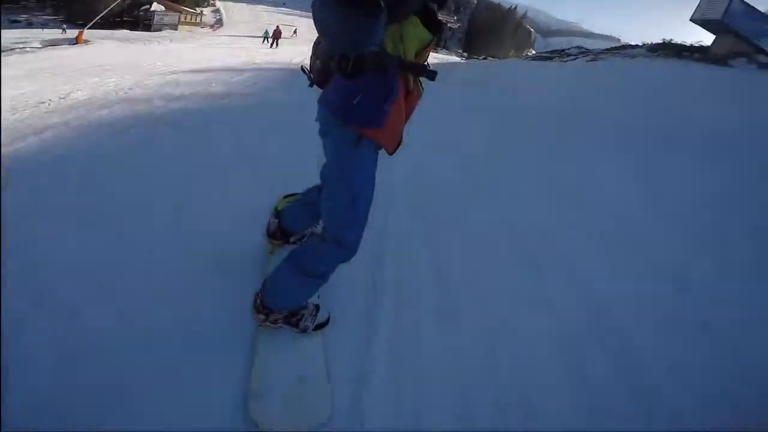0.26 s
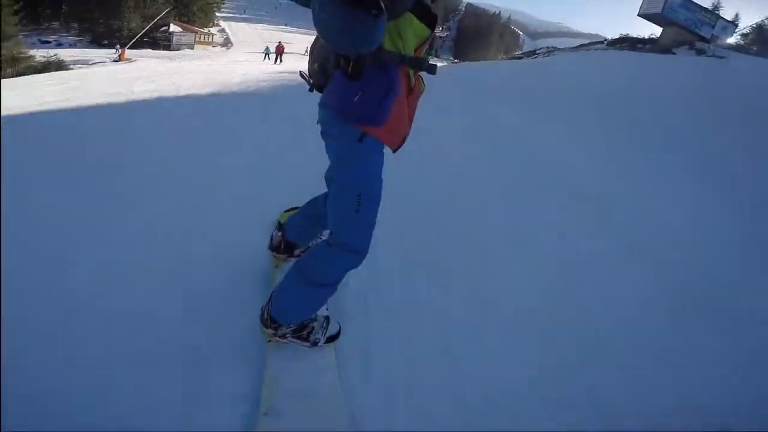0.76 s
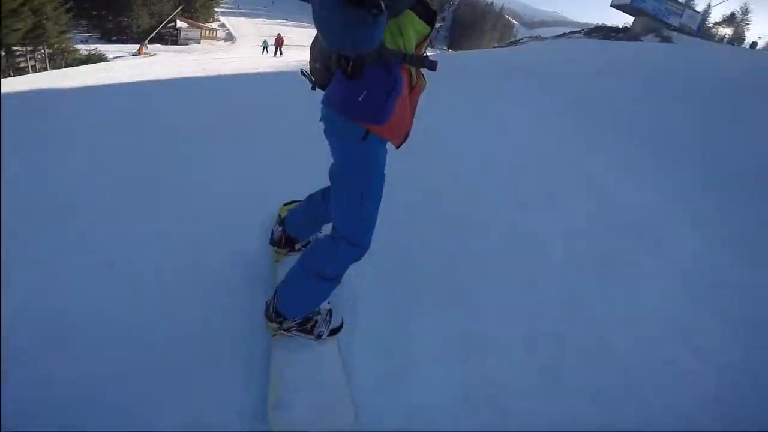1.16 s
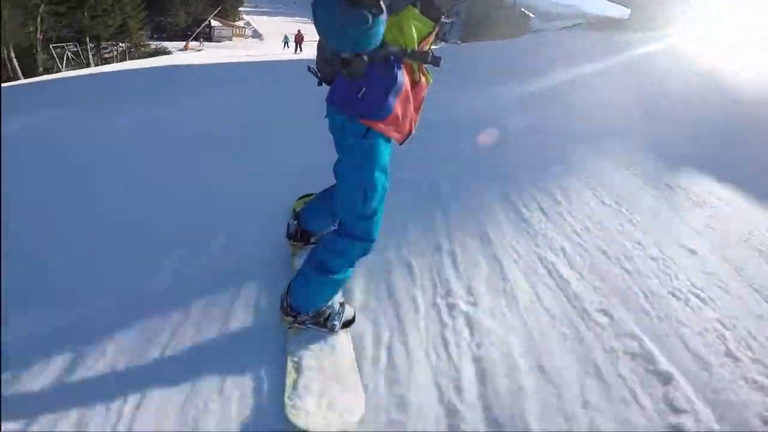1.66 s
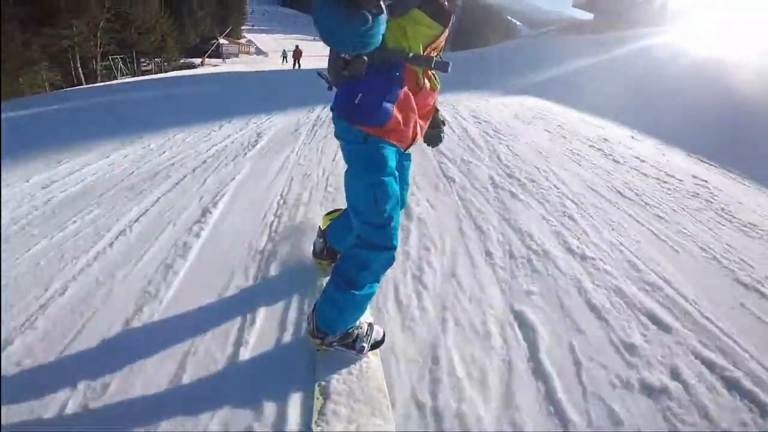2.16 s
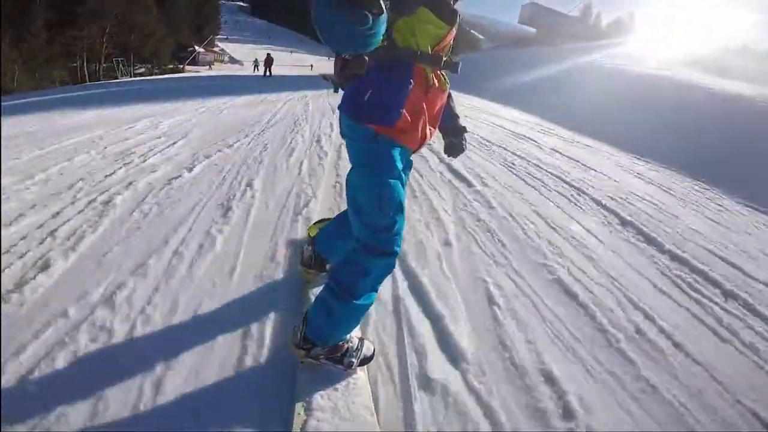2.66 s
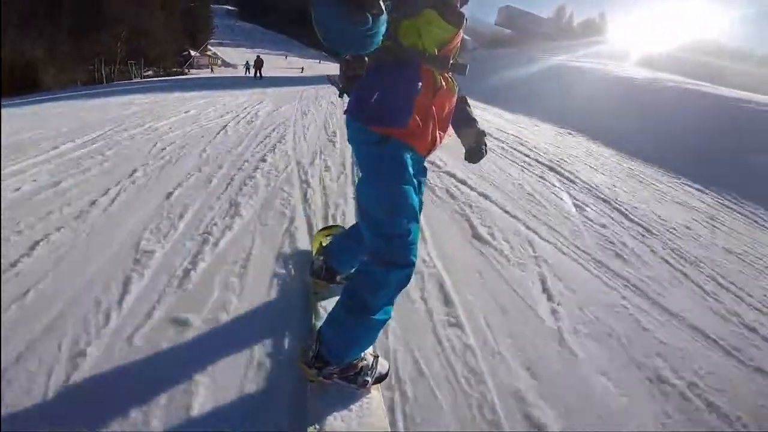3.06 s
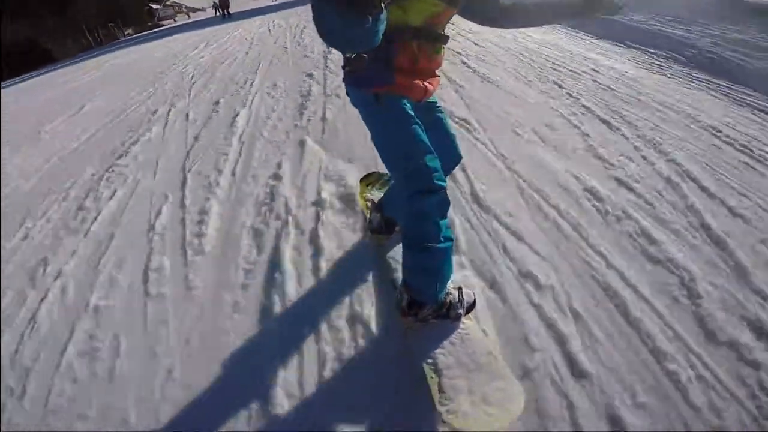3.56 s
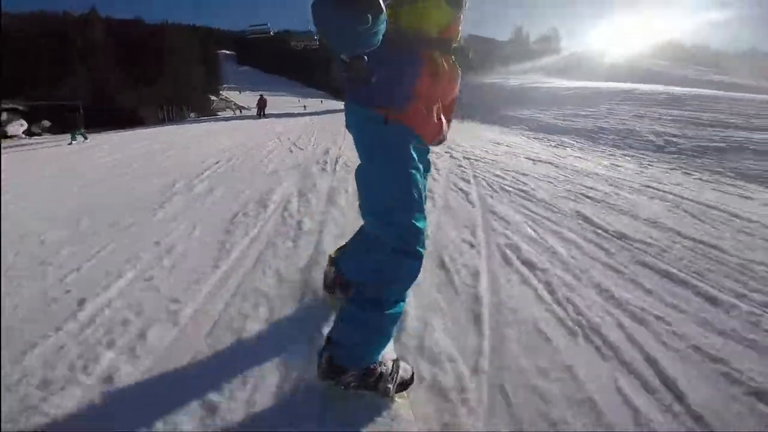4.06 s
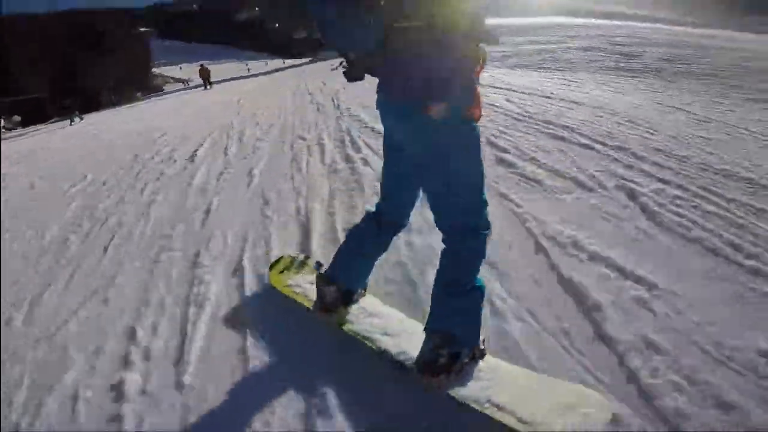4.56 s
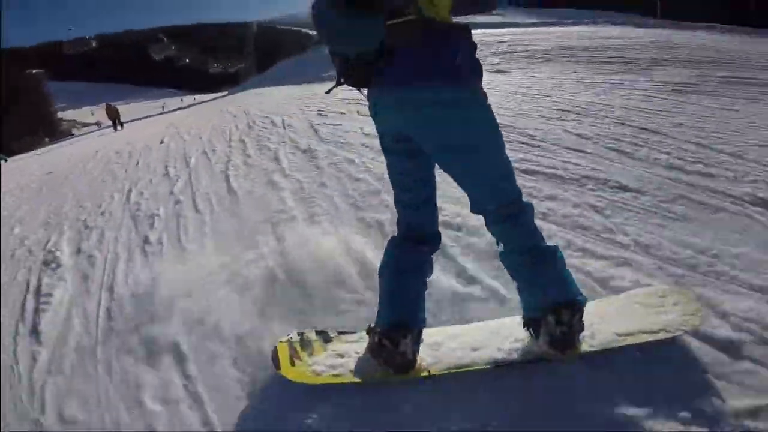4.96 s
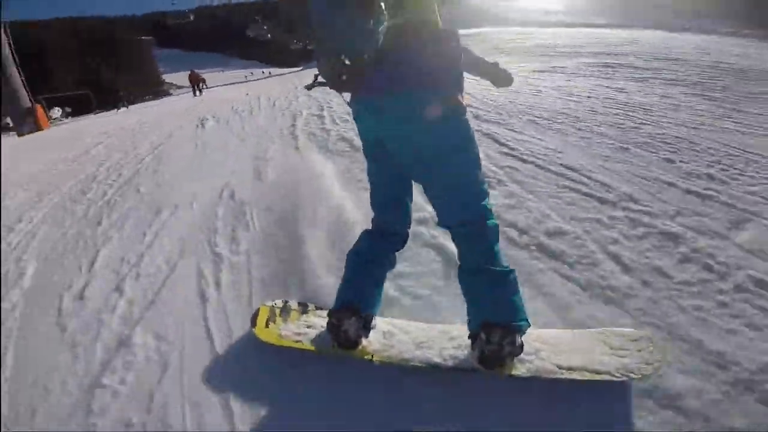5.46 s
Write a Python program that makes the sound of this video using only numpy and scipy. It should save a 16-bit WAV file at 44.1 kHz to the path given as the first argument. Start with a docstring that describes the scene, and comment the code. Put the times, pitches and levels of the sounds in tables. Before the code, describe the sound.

Wind buffets a small encased microphone carried on a pole, making a low, fluttering rumble with a very faint whistle. Close by, a snowboard grinds and hisses across packed snow, ticking against icy lumps. The grinding swells early, then thins out. After a tiny binding creak it builds again in rough bursts with spraying snow, loudest near the end.

```python
"""On a slope of firm groomed snow, a snowboard is heard from a sealed case on a hand-held pole.
Brittle fracture of crystals under the edge gives a scrape, an icy sizzle, a dull roar through the board
and fine spray, all juddering over ridges. Hard lumps crack, and a binding creaks by stick-slip friction.
Turbulent wind buffets the case, whistles faintly over it and shakes the pole at its natural frequency.
The resonances of the case colour all that reaches the small microphone inside."""
import sys
import numpy as np
from scipy import signal
from scipy.io import wavfile

SR = 44100
rng = np.random.default_rng(int(sys.argv[2]) if len(sys.argv) > 2 else 0)


def generate_wav(signal):
    """Clip the signal to [-1, 1] and save it as 16-bit WAV at the path in sys.argv[1]."""
    frames = np.transpose(np.atleast_2d(signal))
    scaled = np.clip(frames, -1, 1) * 32767
    pcm = np.round(scaled).astype(np.int16)
    wavfile.write(sys.argv[1], SR, pcm)


N = 252252

# air whistling over the openings of the case: f/Hz, width/Hz, level/dB
WHISTLE_BANDS = [(443.3, 12, -84), (486, 50, -76.5), (705.6, 66, -71.5), (989, 42, -78.5),
                 (1240, 460, -66.5)]
# swell and fade of all the whistles: t/s, gain/dB
WHISTLE_SWELL = [(0, 8.5), (1.8, -8), (2.9, 6), (3.6, 4), (5.7, 1)]
# mean buffeting of the case: t/s, level/dB
BUFFET_LEVEL = [(0, -44), (3.3, -44.5), (4.0, -47), (5.72, -48)]
# shaking of the pole: t/s, level/dB
SHAKE_LEVEL = [(0.0, -26), (0.05, -23), (0.27, -43), (0.35, -23), (0.75, -34), (1.1, -23.5), (1.18, -38),
               (1.4, -26), (2.18, -31), (2.42, -24.5), (2.47, -39), (2.64, -21), (2.8, -38.5),
               (2.95, -30.5), (3.22, -33), (3.31, -21.5), (3.53, -18.5), (3.58, -35.5), (3.71, -19),
               (3.84, -31.5), (3.92, -24), (4.19, -31), (4.37, -19), (4.49, -41.5), (4.52, -27),
               (5.16, -27.5), (5.21, -23), (5.45, -29), (5.53, -18), (5.72, -27.5)]
# spectra of the wind's forces: f/Hz, relative spectral density/dB
BUFFET_SPECTRUM = [(12, -37), (30, -14), (45, -13), (60, -4.5), (100, -10), (132, -22), (162, -16.5),
                   (200, -32.5), (320, -42.5), (600, -91)]
JOLT_SPECTRUM = [(10, 7.5), (18, -0.5), (30, -1.5), (40, -6), (55, -17)]
# creaks of a binding as the boot twists: middle t/s, level/dB, half length/s
CREAKS = [(3.692, -45, 0.03), (3.738, -47, .01)]
# modes of the plastic binding: f/Hz, width/Hz, relative level/dB
BINDING_MODES = [(1265, 130, -2.5), (1550, 63, -1), (2355, 64, -2)]
# the edge striking hard lumps: t/s, crack level/dB, thud level/dB, thud f/Hz, crumbling time/s
LUMP_STRIKES = [(0.617, -46, -47, 497, 0.0033), (1.289, -37.5, -52, 506, 0.0027),
                (1.489, -38, -42, 399.7, 0.0035), (1.52, -36, -51, 513, 0.0028),
                (1.759, -38.5, -58, 416, 0.0053), (1.90, -39, -64, 500, 0.004),
                (2.58, -39, -60, 400, 0.0036), (2.65, -44.5, -59, 400, 0.0074),
                (3.075, -44.5, -63, 400, 0.0043), (3.221, -45.5, -71, 500, 0.0027),
                (3.897, -33.5, -42.5, 660, 0.0024), (3.929, -41, -50, 410, 0.0023),
                (3.953, -38.5, -54, 460, 0.0034), (3.996, -40, -63, 424, 0.0069),
                (4.034, -41, -53, 590, 0.0062), (4.059, -53, -45, 430, 0.0016),
                (4.139, -44, -58.5, 627.5, 0.0024), (4.549, -49, -53, 426, 0.0034),
                (4.811, -41.5, -61, 500, 0.0077), (4.994, -28.5, -48, 710, 0.002),
                (5.427, -31.5, -62, 450, 0.0031), (5.466, -30.5, -49, 480, 0.0039),
                (5.502, -36, -56, 450, 0.01)]
# thrown snow: t/s, spray level/dB, finest powder level/dB
THROWN_LEVELS = [(0, -61, -63), (1.1, -62, -62), (2.05, -63.5, -65.5), (2.8, -63.5, -65),
                 (3.57, -65.5, -71.5), (3.63, -60, -70), (3.74, -56, -68), (3.77, -59, -59.5),
                 (3.95, -55, -61.5), (4.27, -62.5, -66.5), (4.4, -62.5, -64.5), (4.61, -49, -57),
                 (4.66, -52.5, -53.5), (4.93, -50.5, -54), (5.0, -52, -51), (5.06, -51.5, -53.5),
                 (5.46, -49, -53.5), (5.58, -51.5, -53.5), (5.72, -52, -55)]
# spectra of thrown snow: f/Hz, relative spectral density/dB
SPRAY_SPECTRUM = [(4300, -33), (5500, -2), (7200, 2), (8600, 1), (10000, -31), (12000, -24), (14000, -34)]
POWDER_SPECTRUM = [(7500, -14), (9500, 0), (10700, -3), (12000, 1), (13400, -3), (15000, -4), (19000, -8)]
# the edge on the snow: t/s, scrape level/dB, focus f/Hz, sizzle re scrape/dB, roar re scrape/dB
EDGE_GRIND = [(0, -44.5, 2500, -8.5, -13.5), (.5, -44.5, 2600, -8, -15), (1.2, -38, 2550, -9, -14),
              (1.55, -41, 2500, -7.5, -11.5), (1.9, -43, 2580, -7.5, -11.5),
              (2.25, -46.5, 2780, -8.5, -14.5), (3.33, -49.5, 2830, -9, -14.5),
              (3.42, -55.5, 2400, -6, -10.5), (3.73, -51, 2380, -3, -11), (3.82, -47, 2800, -7, -19),
              (4.03, -45, 2900, -11, -16.5), (4.27, -51, 2650, -9, -12), (4.40, -47, 2860, -8.5, -14.5),
              (4.48, -42, 2600, -8, -13.5), (4.62, -40, 2820, -6, -16), (4.73, -43, 2700, -3.5, -13),
              (4.93, -41.5, 2470, -8, -13.5), (4.99, -34, 2900, -4.5, -13.5), (5.05, -43, 2720, -7, -15),
              (5.25, -36, 2770, -9.5, -15.5), (5.305, -37.5, 2750, -10, -21), (5.32, -35.5, 2500, -7, -16),
              (5.39, -31, 2140, -9, -16), (5.47, -33.5, 2250, -6.5, -9.5), (5.492, -41, 2300, -8, -8),
              (5.51, -33.5, 2300, -5, -10), (5.535, -39, 2270, -3, -6), (5.565, -43, 2400, -9, -15),
              (5.72, -40.5, 2450, -7.5, -14.5)]
# spectra of the grinding edge: f/Hz, relative spectral density/dB
SCRAPE_SPECTRUM = [(850, -31), (1200, -16), (1540, -3.5), (1900, -1), (2750, -2.5), (3700, -3), (4200, -14),
                   (4800, -24)]
SIZZLE_SPECTRUM = [(3600, -13), (4200, 6), (4600, -4.5), (5000, 5), (5500, -4), (6200, -17.5),
                   (7000, -17.5), (9000, -13), (11000, -20.5)]
ROAR_SPECTRUM = [(120, -25), (200, -3.5), (333, -2), (374, -3), (576, -2), (717, -2), (1300, -13.5),
                 (1690, -22), (2860, -120)]
# resonances and notches of the case: f/Hz, width/Hz, gain/dB
CASE_RESPONSE = [(154, 31, 6.5), (429, 20, 3.5), (657, 200, 1.5), (965, 280, -3), (1346, 540, -2.5),
                 (1562, 203, -6), (1750, 120, 2.5), (1910, 184, 4), (2350, 84, 1.5), (2539, 130, -9.5),
                 (2630, 150, 3.5), (3310, 150, 4.5), (3540, 150, -0.5), (3730, 107, 4.5), (3904, 520, -6.5),
                 (5038, 270, 7.5), (7060, 330, 4), (7790, 250, -4), (8900, 190, 0.5), (9750, 1000, -7.5),
                 (11000, 350, 1), (11400, 430, -1.5), (13500, 900, 5.5), (13900, 630, -3)]

GUST_SPREAD_DB, GUSTS_PER_S = 2.5, 8.0
POLE_HZ, POLE_WANDER_HZ = 21, 1.458
CUTOFF_HZ = 15320


def from_db(db):
    """Amplitude ratio of a level in dB."""
    return 10 ** (np.asarray(db) / 20)


def unit_rms(x):
    """Normalisation to rms 1."""
    return x / np.sqrt(np.mean(x ** 2) + 1e-20)


def in_time(rows):
    """Linear interpolation of each column after t/s, sample by sample."""
    times, *columns = np.transpose(rows)
    return [np.interp(np.arange(N) / SR, times, column) for column in columns]


def drift(per_s):
    """Low-pass noise: a random fluctuation of rms 1 with about per_s changes a second."""
    hop, settling = 40, 2000
    r = np.exp(-2 * np.pi * per_s * hop / SR)
    noise = rng.standard_normal(N // hop + settling + 2)
    slow = signal.lfilter([1], [1, -2 * r, r * r], noise)[settling:]
    return np.interp(np.arange(N) / hop, np.arange(len(slow)), unit_rms(slow))


def resonance(x, hz, width_hz):
    """Forced response of a damped oscillator, with gain 1 at its peak."""
    r = np.exp(-np.pi * width_hz / SR)
    gain = (1 - r * r) / 2
    return signal.lfilter([gain, 0, -gain], [1, -2 * r * np.cos(2 * np.pi * hz / SR), r * r], x)


def coloured(sources, spectrum, flicker_db, focus_hz=3000, focus_db=0):
    """Spectral shaping: flickering quarter-octave bands, from two sources in turn, add to rms near 1."""
    hz, level_db = np.transpose(spectrum)
    octaves = np.log2(hz[-1] / hz[0])
    edges = hz[0] * 2 ** np.arange(0, octaves, 1 / 4)
    total, power = 0, 0
    for k, (low, high) in enumerate(zip(edges, edges[1:])):
        centre = np.sqrt(low * high)
        band = signal.sosfilt(signal.butter(2, [low, high], "band", fs=SR, output="sos"), sources[k % 2])
        lift_db = focus_db * np.exp(-(np.log2(centre / focus_hz) / 0.4) ** 2)
        density_db = np.interp(np.log(centre), np.log(hz), level_db) + lift_db
        gain = from_db(density_db) * np.sqrt(high - low)
        power += gain ** 2
        total += gain * unit_rms(band) * from_db(flicker_db * drift(17))
    return total / np.sqrt(power)


def impulses(per_s, spread_db):
    """Shot noise: two streams of tiny impulses, random in time and size."""
    size_db = spread_db * np.minimum(rng.exponential(1, (2, N)), 5)
    sizes = from_db(size_db) * rng.standard_normal((2, N))
    return sizes * (rng.random((2, N)) < per_s / SR)


def whistles():
    """Flow-excited resonance: each opening sings a narrow band of noise that comes and goes."""
    total = 0
    for hz, width_hz, level_db in WHISTLE_BANDS:
        gain = from_db(level_db + 4.5 * drift(2.1))
        band = resonance(rng.standard_normal(N), hz, width_hz)
        total += gain * unit_rms(resonance(band, hz, 2 * width_hz))
    return from_db(in_time(WHISTLE_SWELL)[0]) * total


def pole_shake():
    """Wind-driven vibration: the springy pole swings near its natural frequency, with uneven jolts."""
    pole_hz = POLE_HZ + POLE_WANDER_HZ * drift(3.85)
    swing = np.sqrt(2) * np.sin(2 * np.pi * (np.cumsum(pole_hz) / SR + rng.random()))
    jolts = coloured(rng.standard_normal((2, N)), JOLT_SPECTRUM, flicker_db=3)
    return from_db(in_time(SHAKE_LEVEL)[0]) * (0.97 * swing + from_db(-5) * jolts)


def wind_buffet():
    """Turbulent pressure: eddies thump on the case, swelling with each gust."""
    eddies = coloured(rng.standard_normal((2, N)), BUFFET_SPECTRUM, flicker_db=0.5)
    gust_db = GUST_SPREAD_DB * drift(GUSTS_PER_S)
    return from_db(in_time(BUFFET_LEVEL)[0] + gust_db) * eddies


def binding_creak():
    """Stick-slip friction: quick random slips ring the binding's modes; each creak swells and fades."""
    slips = impulses(1500, spread_db=1)[0]
    ringing = sum(from_db(db) * resonance(resonance(slips, hz, width_hz), hz, 3 * width_hz)
                  for hz, width_hz, db in BINDING_MODES)
    t = np.arange(N) / SR
    envelope = sum(from_db(db) * np.exp(-((t - middle_s) / half_s) ** 2)
                   for middle_s, db, half_s in CREAKS)
    return envelope * unit_rms(ringing)


def lump_impacts():
    """Impact excitation: each lump shatters in a brief crack while the board gives a damped thud."""
    cracks, thuds = np.zeros(N), np.zeros(N)
    age = np.arange(SR // 15) / SR
    shards = rng.choice([-1, 1], (len(LUMP_STRIKES), len(age)))
    for (start_s, crack_db, thud_db, thud_hz, crumble_s), noise in zip(LUMP_STRIKES, shards):
        start = round(start_s * SR)
        span = slice(start, start + len(age))
        crack_envelope = age / crumble_s * np.exp(1 - age / crumble_s)
        thud_envelope = age / 0.0015 * np.exp(1 - age / 0.0021)
        cracks[span] += from_db(crack_db) * crack_envelope * noise
        thuds[span] += from_db(thud_db) * thud_envelope * np.sin(2 * np.pi * thud_hz * age)
    band = signal.butter(3, [1600, 3900], "band", fs=SR, output="sos")
    noise_gain = np.std(signal.sosfilt(band, rng.standard_normal(SR)))
    return signal.sosfilt(band, cracks) / noise_gain + thuds


def thrown_snow():
    """Incoherent addition: countless grains of spray and finer powder merge into a hiss."""
    spray_db, powder_db = in_time(THROWN_LEVELS)
    spray = coloured(impulses(20000, spread_db=1), SPRAY_SPECTRUM, flicker_db=0.7)
    powder = coloured(impulses(20000, spread_db=1), POWDER_SPECTRUM, flicker_db=0.5)
    return from_db(spray_db) * spray + from_db(powder_db) * powder


def snowboard():
    """Brittle fracture: the edge grinds crystals; ridges modulate grind and spray, the roar most."""
    scrape_db, focus_hz, sizzle_db, roar_db = in_time(EDGE_GRIND)
    judder_db = 0.5 * drift(18) + 0.73 * drift(27) + 0.54 * drift(150)
    fractures = impulses(9000, spread_db=-0.5)
    scrape = coloured(fractures, SCRAPE_SPECTRUM, flicker_db=1.18, focus_hz=focus_hz, focus_db=5.5)
    sizzle = coloured(impulses(14000, spread_db=0.7), SIZZLE_SPECTRUM, flicker_db=0.8)
    roar = coloured(impulses(2500, spread_db=0.5), ROAR_SPECTRUM, flicker_db=2)
    grind = from_db(scrape_db) * (scrape + from_db(sizzle_db) * sizzle)
    through_board = from_db(scrape_db + roar_db + 1.65 * judder_db) * roar
    return from_db(judder_db) * (grind + thrown_snow()) + through_board


def scene():
    """Superposition: the sounds of board, binding and wind add at the case, in one channel."""
    ride = snowboard() + lump_impacts() + binding_creak()
    return (ride + pole_shake() + wind_buffet() + whistles())[None]


def record(dry):
    """Filters in cascade: the case lifts or cuts one band after another, then a low-pass cuts the top."""
    for hz, width_hz, gain_db in CASE_RESPONSE:
        dry = dry + (from_db(gain_db) - 1) * resonance(dry, hz, width_hz)
    return signal.sosfilt(signal.ellip(12, 0.5, 50, CUTOFF_HZ, fs=SR, output="sos"), dry)


dry = scene()
out = record(dry)
generate_wav(out)
```